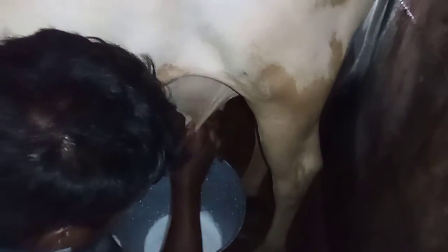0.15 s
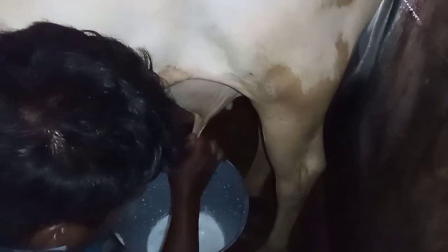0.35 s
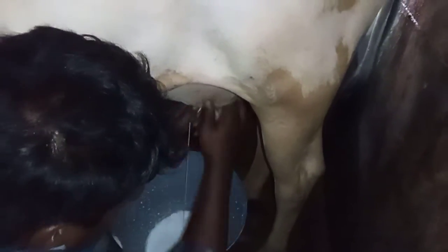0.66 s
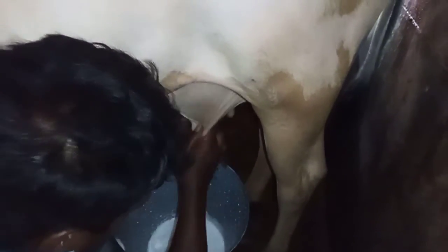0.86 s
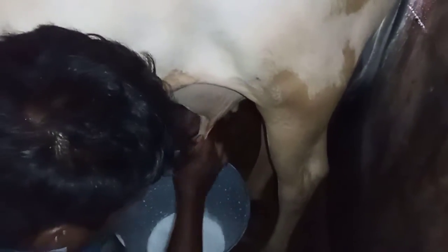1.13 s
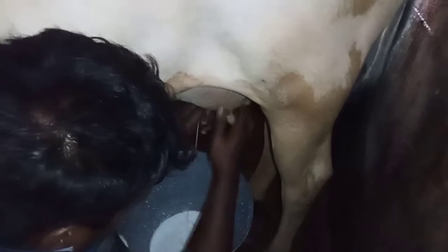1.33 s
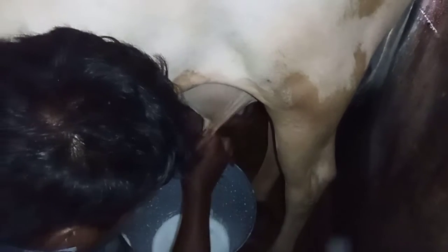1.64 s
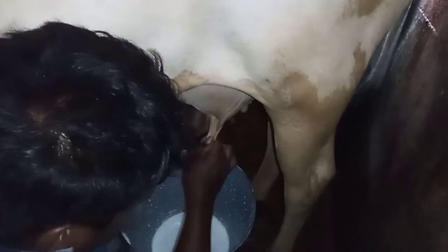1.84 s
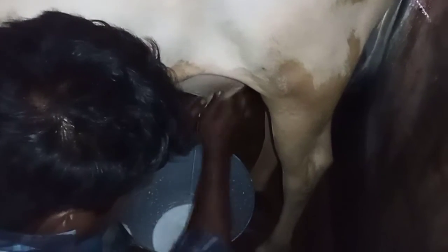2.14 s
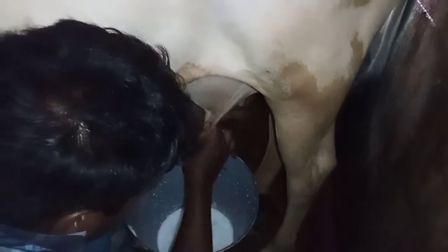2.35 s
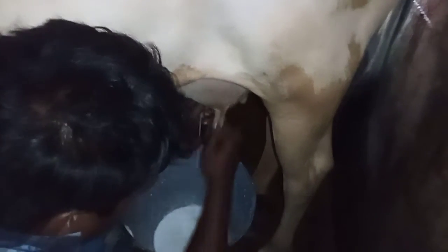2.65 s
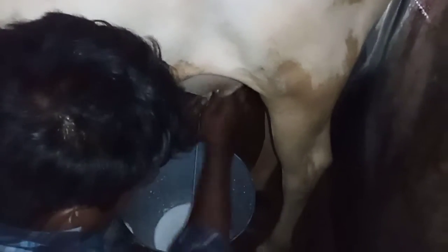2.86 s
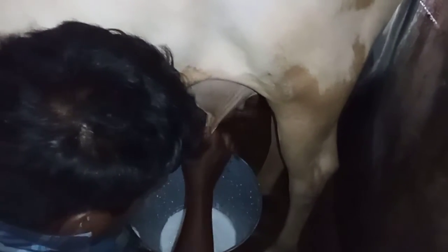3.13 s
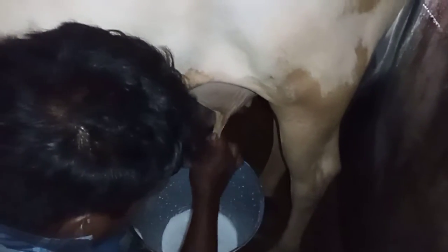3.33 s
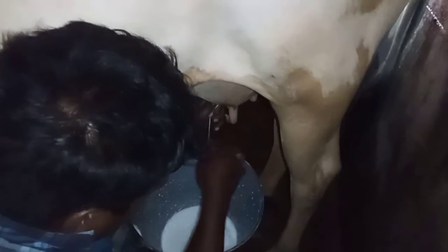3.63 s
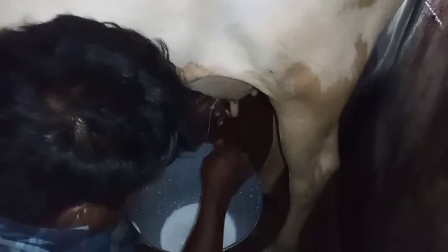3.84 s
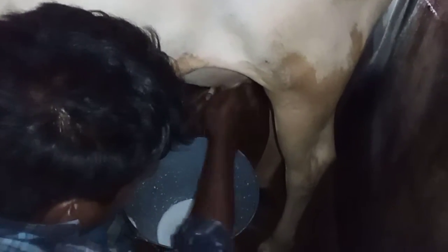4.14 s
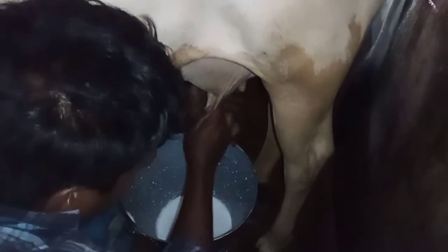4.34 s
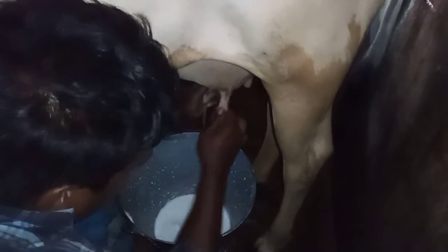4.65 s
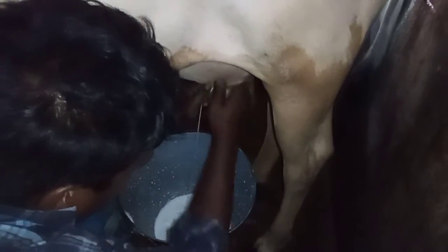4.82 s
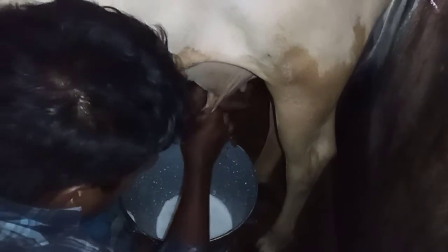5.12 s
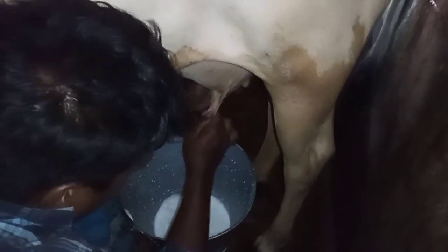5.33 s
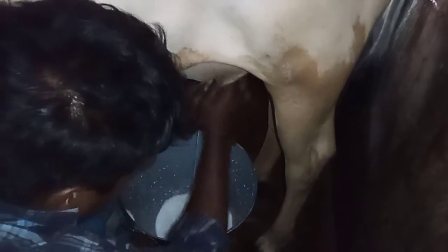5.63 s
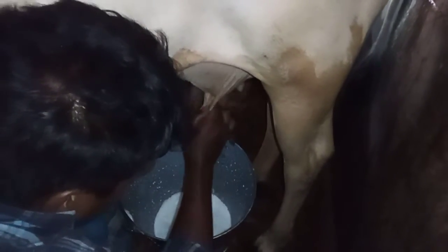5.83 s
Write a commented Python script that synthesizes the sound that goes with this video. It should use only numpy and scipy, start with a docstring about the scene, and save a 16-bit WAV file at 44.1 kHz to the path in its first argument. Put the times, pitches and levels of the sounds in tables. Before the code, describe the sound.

Jets of milk squirt in a steady alternating rhythm into a partly filled steel pail, hissing through froth over hollow bubbling.

```python
"""Jets of milk, pulled by two hands in turn, strike a partly filled steel pail; strokes near 4 s are weak.
Each jet hisses through the froth as dense trains of tiny bubble rings; noise slaps add whole drops.
Hollows in the milk squelch as gliding resonances; spits, drips and ticks are short bursts or decaying tones.
Bubbles drum on the pail's air modes, large ones gulp as swelling tones, and the steel wall rings faintly.
A small shed adds dense reflections, a noise floor and two low rumbles."""
import sys
import numpy as np
from scipy import signal
from scipy.fft import rfft, irfft
from scipy.io import wavfile
from scipy.ndimage import uniform_filter1d, map_coordinates

SR = 44100
rng = np.random.default_rng(int(sys.argv[2]) if len(sys.argv) > 2 else 0)


def output_pcm(signal):
    """Save a mono or channel-first signal as 16-bit PCM at the path in sys.argv[1].

    Samples are clipped to [-1, 1] before scaling.
    """
    pcm = np.clip(np.atleast_2d(signal).T, -1, 1) * 32767
    wavfile.write(sys.argv[1], SR, np.round(pcm).astype(np.int16))


N = 263718
TIME = np.arange(N) / SR


def amp(db):
    """Decibels to gain."""
    return 10 ** (np.asarray(db) / 20)


def unit(x):
    """Scales to an rms of 1."""
    return x / np.sqrt(np.mean(x ** 2) + 1e-20)


def read(points, hz):
    """Interpolates a table on a log-frequency axis."""
    point_hz, value = np.transpose(points)
    return np.interp(np.log(hz + 1), np.log(point_hz + 1), value)


def add(mix, start_s, sound):
    """Mixes a sound in at start_s."""
    part = mix[max(round(start_s * SR), 0):][:len(sound)]
    part += sound[:len(part)]


def colour(x, spectrum):
    """Causal minimum-phase filter with the given spectrum, so that clicks keep a sharp front."""
    size = 4096
    log_gain = np.log(amp(read(spectrum, abs(np.fft.fftfreq(size, 1 / SR)))))
    min_phase = np.exp(np.conj(signal.hilbert(log_gain)))
    taps = np.fft.ifft(min_phase).real[:size // 2]
    return signal.oaconvolve(x, taps / np.linalg.norm(taps))[:len(x)]


def resonate(x, hz, width_hz):
    """One-pole resonance of gain 1 at a fixed or moving frequency."""
    turn = np.exp(2j * np.pi * np.cumsum(hz * np.ones(len(x))) / SR)
    r = np.exp(-np.pi * width_hz / SR)
    baseband = signal.lfilter([1 - r], [1, -r], x / turn + 1e-18)
    return 2 * (turn * baseband).real


def ringing(modes):
    """Impulse response of decaying modes, each with its gain at resonance."""
    t = np.arange(SR // 3) / SR
    response = np.zeros(len(t))
    for hz, width_hz, db in modes:
        gain = amp(db) * 2 * np.pi * width_hz / SR
        response += gain * np.exp(-np.pi * width_hz * t) * np.cos(2 * np.pi * hz * t)
    return response


def wobble(rate_hz):
    """Smooth random signal of rms 1, with a Gaussian roll-off at the given rate."""
    hz = np.fft.rfftfreq(N, 1 / SR)
    return unit(irfft(rfft(rng.standard_normal(N)) * np.exp(-(hz / rate_hz) ** 2), N))


def drops(per_s, spread_db):
    """Random train of impacts of either sign, most small and a few large."""
    size = amp(spread_db * np.minimum(rng.exponential(1, N), 5))
    return unit(size * rng.choice([-1, 1], N) * (rng.random(N) < per_s / SR))


def pops(lo_hz, hi_hz, cycles, spread_db, clump_db, count, size):
    """Tiny bubbles, each ringing at its own rising pitch; like sizes clump. Even power per Hz."""
    when, height, luck, polarity = rng.random((count, 4)).T
    field = rng.standard_normal((240, 9))  # time x pitch
    place = [when * (len(field) - 1), height * (field.shape[1] - 1)]
    clumps = map_coordinates(field, place, order=2, mode="nearest")
    hz = lo_hz * (hi_hz / lo_hz) ** height
    strength = hz * amp(spread_db * np.minimum(-np.log(luck), 5) + clump_db * clumps)
    age = np.arange(size) / size
    turns = hz[:, None] * np.arange(size) / SR
    envelope = np.exp(-turns / cycles) * (1 - age ** 2)
    ring = envelope * np.sin(2 * np.pi * turns * (1 + age / 10)) * np.sign(polarity - .5)[:, None]
    at = (when * N).astype(int)[:, None] + np.arange(size)
    return unit(np.bincount(at.ravel(), (strength[:, None] * ring).ravel(), N)[:N])


FADE_DB, FADE_CURVE = -21, 1.35  # drop reached after fade_s; exponent of the fade in dB


def swell(start_s, rise_s, length_s, fade_s):
    """Rises from start_s, holds until length_s has passed, then fades ever faster."""
    late = np.maximum(TIME - start_s - length_s, 0) / fade_s
    return np.clip((TIME - start_s) / rise_s, 0, 1) * amp(np.maximum(FADE_DB * late ** FADE_CURVE, -200))


# Still-air spectrum. Each row: frequency in Hz, relative level in dB per Hz.
SHED_AIR = [(20, -12), (60, 8.5), (100, 12), (300, 5), (1000, -27), (3000, -10), (6500, 7), (8000, -11),
            (16000, -19)]
# Soft low rumbles. Each row: start in seconds, level in dB.
RUMBLES = [(4.35, -43), (4.53, -45)]


def background(rise_s=0.028):
    """Still air of the shed as coloured noise, and two brief rumbles as noise resonating at 80 Hz."""
    floor = amp(-52.0) * colour(rng.standard_normal(N), SHED_AIR)
    rumble = unit(resonate(resonate(rng.standard_normal(N), 80, 43), 80, 43))
    level = sum(amp(db) * swell(s, rise_s, rise_s, fade_s=0.078) for s, db in RUMBLES)
    return floor + rumble * level


def echoes(t60, length_s, count):
    """Sets of dense reflections of energy 1, each band dying at its own speed."""
    size = int(length_s * SR)
    taps = rng.standard_normal((count, size))
    taps[:, :SR // 800] = 0  # gap before the first reflection
    hz, t, z = signal.stft(taps, SR, nperseg=256)
    tails = signal.istft(z * amp(-60 * t / read(t60, hz)[:, None]), SR)[1]
    return tails / np.linalg.norm(tails, axis=1, keepdims=True)


def reflect(x, t60, length_s, count):
    """Dense reflections without a steady pitch: many random sets crossfade in turn."""
    out, hop = np.zeros(N + SR), N // count + 1
    window = np.sin(np.pi * np.arange(2 * hop) / (2 * hop))
    padded = np.pad(x, (hop, 2 * hop))
    for k, tail in enumerate(echoes(t60, length_s, count=count + 1)):
        piece = padded[k * hop:][:2 * hop] * window
        add(out, k * hop / SR, signal.fftconvolve(piece, tail))
    return out[hop:hop + N]


# Steel wall modes. Each row: frequency in Hz, width in Hz, relative gain in dB.
STEEL_MODES = [(658, 28, 8), (755, 21, 15), (925, 15, 13.5), (971, 18, -4), (1070, 32, -11), (1295, 38, 8),
               (1507, 60, -4.5), (1712, 16, -14), (1830, 31, -11.5), (2020, 18, -18), (2240, 14, -4),
               (2360, 13, 2), (3056, 69, 2), (3785, 33, 0)]


def pail(x):
    """Sound bounces between the walls and sets the steel modes ringing."""
    t60 = [(500, 0.056), (12000, 0.028)]  # Hz, s
    inside = amp(-1.5) * x + amp(-5.5) * reflect(x, t60, length_s=1 / 10, count=96)
    return inside + amp(-6) * signal.oaconvolve(inside, ringing(STEEL_MODES))[:N]


# Stray drops on the bare wall. Each row: start in seconds, relative level in dB.
TICKS = [(1.487, -39), (1.683, -24), (2.387, -14.5), (2.712, -25), (3.148, -25), (3.875, -26), (4.062, -44),
         (4.113, -22.5), (5.763, -22)]
# Tick spectrum. Each row: frequency in Hz, relative level in dB per Hz.
TICK_SPECTRUM = [(1000, -22), (6500, -3), (8000, -11), (9500, 1), (15500, -2)]


def ticks(fade_s=0.002):
    """Stray drops hit the bare steel with a thin, bright snap of decaying noise."""
    envelope, t = np.zeros(N), np.arange(SR // 20) / SR
    for s, db in TICKS:
        add(envelope, s, amp(db) * np.exp(-t / fade_s))
    return colour(envelope * rng.standard_normal(N), TICK_SPECTRUM)


# Drops that trap a bubble. Each row: start in seconds, relative level in dB, starting pitch in Hz,
# decay time in seconds.
DRIPS = [(1.442, -11, 4700, 0.0022), (3.8655, -17.5, 2910, 0.0035), (4.504, -14, 2080, 0.005),
         (5.156, -17, 6150, 0.0027)]


def drips(rise_s=0.0012, glide_per_s=0.32):
    """A single drop traps a bubble that starts at once, rises slightly in pitch and dies away."""
    out, t = np.zeros(N), np.arange(SR // 6) / SR
    for s, db, hz, decay_s in DRIPS:
        turns = np.cumsum(hz * (1 + glide_per_s * t)) / SR
        envelope = np.minimum(t / rise_s, 1) * np.exp(-t / decay_s)
        add(out, s, amp(db) * envelope * np.sin(2 * np.pi * turns))
    return out


# Large bubbles swinging with the pail air. Each row: start in seconds, swell time constant in seconds
# (the peak comes after two), peak in dB, pitch at the peak in Hz.
GULPS = [(0.308, 0.006, -17, 417), (0.335, 0.011, -16.5, 423), (0.825, .012, -16, 274),
         (1.43, 0.015, -22, 410), (1.6, 0.019, -19.5, 277.7), (1.796, 0.01, -18, 414),
         (1.963, 0.0074, -19, 408), (2.109, 0.0055, -20, 390), (2.595, 0.008, -14.5, 286),
         (2.873, 0.0043, -19, 343), (2.925, 0.012, -17, 286.4), (2.989, 0.0046, -12, 287),
         (3.235, .02, -16, 275.4), (3.36, 0.062, -26.5, 280), (3.61, 0.012, -22.5, 274),
         (4.55, 0.022, -17, 267), (4.9, 0.0113, -21, 426), (4.988, 0.005, -18.5, 315),
         (5.103, 0.0047, -13.5, 330)]


def gulps(glide=0.0049):
    """A large bubble swells and dies away as a tone, rising a little in pitch."""
    out, t = np.zeros(N), np.arange(SR // 2) / SR
    for s, swell_s, db, hz in GULPS:
        age = t / swell_s
        swing = age ** 2 * np.exp(-age)
        turns = np.cumsum(hz * (1 + glide * (age - 2))) / SR
        add(out, s, amp(db) * swing / swing.max() * np.sin(2 * np.pi * turns))
    return out


# Air dragged under comes up. Each row: start in seconds, rise in seconds, length in seconds,
# relative level in dB.
CLOUDS = [(-0.05, 0.027, 0.22, -21), (0.295, 0.019, 0.13, -25.5), (0.46, 0.045, 0.2, -22.5),
          (0.676, 0.12, 0.25, -20), (0.968, 0.069, 0.1, -23), (1.134, 0.017, 0.21, -21),
          (1.387, 0.048, 0.31, -23), (1.724, 0.039, 0.32, -21.5), (2.098, 0.012, 0.31, -22),
          (2.417, 0.039, 0.36, -21.5), (2.82, 0.043, 0.28, -21.5), (3.174, 0.06, 0.36, -20.5),
          (3.599, 0.023, 0.14, -21.5), (3.771, 0.014, 0.11, -26.5), (4.031, 0.0096, 0.17, -43.5),
          (4.115, 0.095, 0.23, -26), (4.541, 0.013, 0.16, -23), (4.862, 0.05, 0.26, -21),
          (5.28, 0.035, 0.19, -22.5), (5.621, 0.02, 0.26, -22.5)]
CLOUD_SAG_DB_PER_S, CLOUD_FADE_S = -13, 0.092
SKIM_CHURN_DB = -4.5  # steady bubbling, relative to the jet's hiss


def rising_air(jet):
    """Strength of the bubbling: one cloud after another, and a trickle under the running jet."""
    power = (amp(SKIM_CHURN_DB) * jet) ** 2
    for s, rise_s, length_s, db in CLOUDS:
        sag_db = CLOUD_SAG_DB_PER_S * np.maximum(TIME - s, 0)
        power = power + (amp(db + sag_db) * swell(s, rise_s, length_s, CLOUD_FADE_S)) ** 2
    return np.sqrt(power)


# Pail air modes. Each row: frequency in Hz, width in Hz, relative gain in dB.
AIR_MODES = [(151, 18, -5), (291, 4.5, 4), (276.1, 23.6, 12), (322.6, 73, 0), (396.7, 22, -2),
             (426.5, 13.3, -1)]
# Drumming spectrum. Each row: frequency in Hz, relative level in dB per Hz.
BUBBLE_SPECTRUM = [(30, -25), (100, -15.5), (180, -11), (260, -2), (430, 7), (490, -24), (900, -1.5),
                   (2500, -67)]


def churn(air, steadiness=0.88):
    """Air dragged under the milk bubbles up and drums on the air column of the pail."""
    drumming = signal.oaconvolve(drops(per_s=390, spread_db=2.0), ringing(AIR_MODES))[:N]
    boom = unit(colour(drumming, BUBBLE_SPECTRUM))
    # divide by the short-term level: slow swells of the drumming are evened out, the quick throb stays
    power = abs(uniform_filter1d(boom ** 2, size=SR // 14)) + 1e-6
    return amp(-2.0) * unit(boom / power ** (steadiness / 2)) * air


# Gurgle spectrum. Each row: frequency in Hz, relative level in dB per Hz.
GURGLE_SPECTRUM = [(60, -10), (200, 3.5), (450, 1), (650, -5.5), (820, -7.5), (1000, -0.5), (1300, -5),
                   (2200, -14.5)]


def gurgle(air):
    """Middling bubbles burst where the milk churns, varying less in level than the drumming."""
    bubbles = pops(438, 1780, cycles=5.2, spread_db=0.5, clump_db=1.0, count=4200, size=640)
    return amp(-24.0) * unit(colour(bubbles, GURGLE_SPECTRUM)) * air ** 0.7


# Spray where a jet catches or breaks. Each row: start in seconds, relative level in dB.
SPITS = [(0.274, -40), (0.646, -27), (0.718, -24.5), (1.042, -25), (1.411, -26), (1.439, -26),
         (2.106, -22.5), (3.578, -22), (3.888, -32), (4.012, -45), (4.334, -38), (4.555, -29), (4.811, -29),
         (5.154, -35), (5.246, -24.5)]
# Spit spectrum. Each row: frequency in Hz, relative level in dB per Hz.
SPIT_SPECTRUM = [(500, -31), (2500, 4.5), (4500, -7), (6600, 10), (8200, -2), (11500, 0), (13900, -13),
                 (14700, -1), (16000, 6)]
START_SPIT_DB = -3.5  # spit at a jet's start, relative to its spray entry


def spits(fade_s=0.0095, snap_db=15):
    """A snap and a short noise burst of drops too fine to tell apart, also at the jet starts after 0 s."""
    burst, snaps, t = np.zeros(N), np.zeros(N), np.arange(SR // 10) / SR
    starts = [(s, spray_db + START_SPIT_DB) for s, *_, spray_db in STROKES if s > 0]
    for s, db in SPITS + starts:
        add(burst, s, amp(db) * np.exp(-t / fade_s))
        add(snaps, s, amp([db + snap_db]))
    return amp(4.5) * colour(burst * rng.standard_normal(N) + snaps, SPIT_SPECTRUM)


# Hollows dug in the milk. Each row: start in seconds, rise in seconds, length in seconds, relative level
# in dB, pitch in Hz, glide in octaves, width as a share of the pitch at mid-length.
SQUELCHES = [(0.255, 0.011, 0.058, -22.5, 1860, -0.97, 1.5), (0.379, 0.038, 0.11, -23, 3030, -0.16, .28),
             (0.658, 0.019, 0.058, -20, 2100, -1.9, 0.64), (0.684, 0.0082, 0.022, -25, 1620, 0.05, .4),
             (0.71, .002, 0.033, -18, 2710, 0.35, 0.49), (0.999, 0.022, 0.068, -28, 2260, -0.2, 1.3),
             (1.095, .012, 0.038, -24, 2260, 0.27, 0.23), (1.356, 0.012, 0.079, -27.5, 1880, 0.05, 0.7),
             (1.82, .008, 0.068, -21, 3570, -0.019, 0.55), (2.062, 0.004, 0.021, -15.5, 3150, -0.14, 0.16),
             (2.081, 0.0046, 0.046, -19.5, 2500, 0.77, 0.47), (2.234, .006, 0.067, -26, 2200, 0, .7),
             (2.778, 0.036, 0.062, -19.5, 2100, -1.4, 0.73), (3.123, 0.012, 0.058, -28, 1360, 0.44, 0.26),
             (3.588, 0.023, 0.064, -19, 2200, 0.71, 0.54), (3.869, 0.00088, 0.058, -33, 3100, 0.87, 0.34),
             (4.03, 0.018, 0.13, -43.5, 1036, -0.27, 0.29), (4.155, 0.016, 0.19, -38.5, 940, 0.54, 0.83),
             (4.501, 0.00076, 0.064, -21, 2950, 0.73, 0.82), (4.813, 0.024, 0.135, -22.5, 2250, 0.11, 1),
             (5.023, .01, 0.053, -28, 4680, 0.12, 1), (5.178, 0.016, 0.03, -20, 2400, -.5, .6),
             (5.204, .002, 0.021, -21, 2000, -0.5, 0.81), (5.232, .003, 0.074, -23, 3800, -0.5, 0.63),
             (5.585, 0.018, 0.056, -17, 3350, -0.25, 0.47), (5.599, .01, 0.056, -20.5, 1770, -0.42, 0.3),
             (5.631, 0.011, .035, -20, 6450, 0, 0.32), (5.799, 0.021, 0.074, -29, 1650, 0.12, 0.69)]
DIP_OCTAVES = 0.17  # sink in pitch while the hollow is deepest
DEEP_DB = -12  # table level of a fully open hollow


def squelches(fall_s=0.0041, cut_hz=950, sag_db=-2.5):
    """Drops ring the hollow; depth lowers its pitch, closing raises it, and a glide is added."""
    out, impacts = np.zeros(N), drops(per_s=3800, spread_db=2.5)
    for s, rise_s, length_s, db, pitch_hz, glide, width_share in SQUELCHES:
        u = np.linspace(0, 1, int(length_s * SR))
        hz = pitch_hz * 2 ** (glide * (u - .5) + DIP_OCTAVES * (.5 - np.sin(np.pi * u)))
        width_hz = width_share * hz[len(u) // 2]
        drive = np.roll(impacts, -int(s * SR))[:len(u)]
        # high-pass the drive, so that the squelch keeps to its pitch without low thumps
        highpass = signal.butter(3, min(cut_hz, .7 * hz.min()), "high", fs=SR, output="sos")
        drive = signal.sosfilt(highpass, drive)
        hollow = resonate(resonate(drive, hz, width_hz), hz, 2 * width_hz)
        hollow = unit(resonate(hollow, hz, 2 * pitch_hz))
        opening = np.clip(np.minimum(u * length_s / rise_s, (1 - u) * length_s / fall_s), 0, 1)
        add(out, s, amp(db + sag_db * (u - .5)) * hollow * opening)
    return amp(-3.5) * out


def hollow_open():
    """How far a hollow stands open in the milk, 0-1: the louder its squelch, the deeper it is."""
    depth = np.zeros(N)
    for s, _, length_s, db, *_ in SQUELCHES:
        depth += amp(db - DEEP_DB) * np.sin(np.pi * np.clip((TIME - s) / length_s, 0, 1))
    return np.minimum(depth, 1)


# Pulls on a teat. Each row: start in seconds, delay until the jet pierces the froth in seconds, length of
# the squeeze in seconds, fade in seconds, then relative levels of splash, hiss and spray in dB.
STROKES = [(-0.15, 0.077, 0.21, 0.24, -26.5, -29, -32.5), (0.22, 0.021, 0.45, 0.24, -27, -26.5, -29.5),
           (0.585, 0.1, 0.086, 0.4, -22, -24.5, -29.5), (0.955, 0.15, 0.26, 0.88, -24.5, -24.5, -30),
           (1.345, 0.058, 0.12, 0.39, -23, -26.5, -29.5), (1.67, 0.024, 0.42, 0.093, -26, -28, -29.5),
           (1.997, 0.028, 0.32, 0.2, -26, -26.5, -29), (2.37, 0.022, 0.31, 0.33, -25.5, -27, -27.5),
           (2.703, 0.061, 0.22, 0.37, -24.5, -25.5, -28.5), (3.086, 0.042, 0.33, 0.32, -24, -25.5, -28.5),
           (3.502, 0.063, 0.12, 0.38, -25, -28, -31), (3.763, 0.0049, 0.033, 0.18, -30, -31, -34),
           (4.009, 0.065, 0.17, .05, -48, -46, -50.5), (4.14, 0.029, 0.23, 0.041, -39, -41.5, -48),
           (4.478, 0.0094, 0.15, 0.18, -26.5, -27.5, -32), (4.758, 0.064, 0.14, 0.4, -26, -27, -30.5),
           (5.148, 0.081, 0.14, 0.35, -22, -23.5, -28), (5.495, 0.11, 0.37, 0.15, -25, -25, -28),
           (5.895, 0.045, 0.12, 0.13, -20.5, -25.5, -26)]
OPEN_S, PIERCE_S = 0.012, 0.013
# Each layer: level while skimming the froth in dB, sag in dB per s, share of the stroke's fade time.
SPLASH_SHAPE, HISS_SHAPE, SPRAY_SHAPE = (-8.5, -18.5, 0.76), (-6, -15, 0.73), (-0.33, -11.5, 1)


def flow(shape, axis):
    """Layer strength: the jet opens, pierces the froth, sags with the grip, fades as the teat empties."""
    skim_db, sag_db_per_s, fade_share = shape
    power = np.zeros(N)
    for s, delay_s, length_s, fade_s, *levels_db in STROKES:
        under_s = np.maximum(TIME - s - delay_s, 0)
        skim = np.maximum(1 - under_s / PIERCE_S, 0)
        db = levels_db[axis] + skim_db * skim + sag_db_per_s * under_s
        power += (amp(db) * swell(s, OPEN_S, length_s, fade_s * fade_share)) ** 2
    return np.sqrt(power)


# Jet layer spectra. Each row: frequency in Hz, relative level in dB per Hz.
SPLASH_SPECTRUM = [(60, -29), (200, -11), (500, -17.5), (800, -19), (1100, -1), (1420, -7), (1800, 0.5),
                   (3000, -3.5), (4000, -3), (5500, -32.5), (9000, -15)]
HISS_SPECTRUM = [(1500, -41), (3000, -14), (4100, 0), (5000, 0.5), (6600, -0.5), (7400, -13), (8300, -19),
                 (11000, -18)]
SPRAY_SPECTRUM = [(3000, -8), (6500, 7.5), (8200, -0.5), (10000, 3.5), (11600, 5), (13000, -1), (13950, 0),
                  (14600, 5), (15300, 4.5), (16000, 5.5)]
SLAP_SPECTRUM = [(200, -44), (900, -8), (1800, 6.5), (3500, 4), (6600, 2.5), (8500, -16)]
CRACKLE_S = 0.0016  # decay after a whole drop lands


def jets(jet):
    """The stream breaks into drops that splash, burst the froth and throw spray, sputtering together."""
    sputter = wobble(rate_hz=92)
    splash = pops(595, 5400, cycles=1.36, spread_db=0.5, clump_db=0.5, count=8000, size=280)
    hiss = pops(2670, 8530, cycles=1.8, spread_db=2.0, clump_db=2.5, count=15000, size=96)
    spray = pops(5570, 16200, cycles=6.8, spread_db=3.0, clump_db=3.5, count=26000, size=64)
    splash = unit(colour(splash, SPLASH_SPECTRUM) * amp(0.24 * sputter)) * flow(SPLASH_SHAPE, axis=0)
    hiss = unit(colour(hiss, HISS_SPECTRUM) * amp(1.5 * sputter)) * jet
    spray = unit(colour(spray, SPRAY_SPECTRUM) * amp(0.43 * sputter)) * flow(SPRAY_SHAPE, axis=2)
    # a few whole drops slap the surface with a sharp front and crackle briefly in the froth
    age_s = np.arange(SR // 50) / SR
    hits = signal.oaconvolve(abs(drops(per_s=30, spread_db=0.5)), np.exp(-age_s / CRACKLE_S))[:N]
    slaps = unit(colour(hits * rng.standard_normal(N), SLAP_SPECTRUM)) * jet
    return amp(-4.5) * splash + amp(-3.5) * hiss + amp(-2.5) * spray + amp(-8.0) * slaps


# Shed reverberation. Each row: frequency in Hz, t60 in seconds.
SHED_T60 = [(250, 0.31), (700, 0.1), (1800, 0.91), (4500, 0.73), (8000, 0.42), (12000, 0.34)]
STALL_DB = -6  # drumming lost while a hollow is fully open


def scene():
    """Everything in the pail, with the shed around it."""
    jet, hollow = flow(HISS_SHAPE, axis=1), hollow_open()
    air = rising_air(jet)
    surface = jets(jet) + gurgle(air) + squelches() + spits() + drips() + ticks()
    milk = pail(surface) + churn(air) * amp(STALL_DB * hollow) + gulps()
    shed = reflect(milk, SHED_T60, length_s=1 / 2, count=20)
    return (milk + amp(-10.5) * shed + background())[None]


def record(dry):
    """Band limit: a steep linear-phase low-pass."""
    edge_hz = 15820
    taps = signal.firwin(511, edge_hz, window=("kaiser", 9), fs=SR)
    return signal.oaconvolve(dry, taps[None], "same")


dry = scene()
out = record(dry)
output_pcm(out)
```